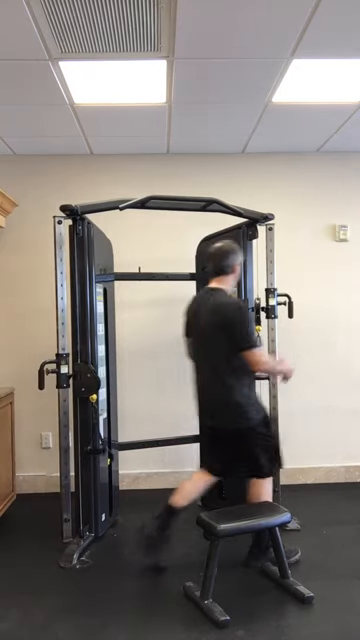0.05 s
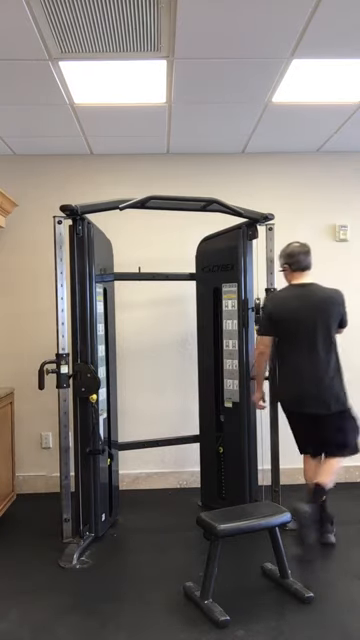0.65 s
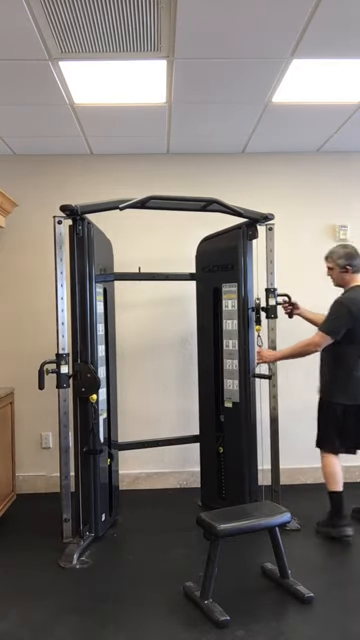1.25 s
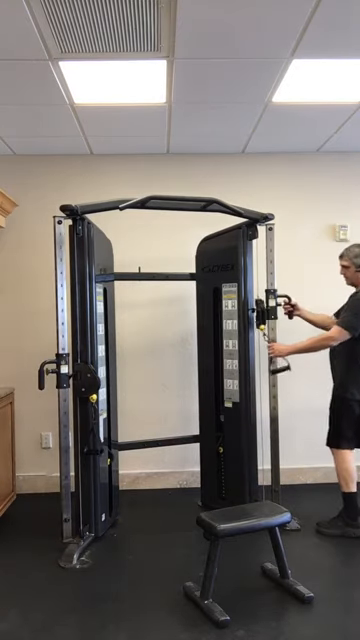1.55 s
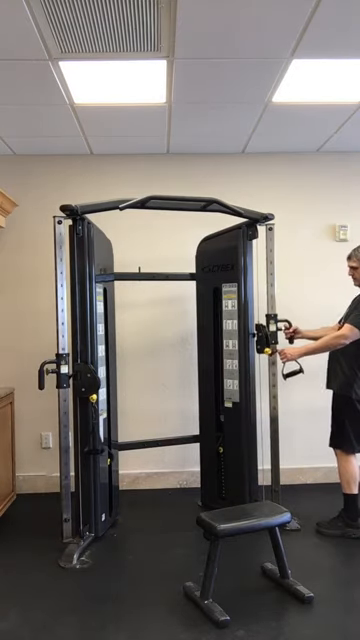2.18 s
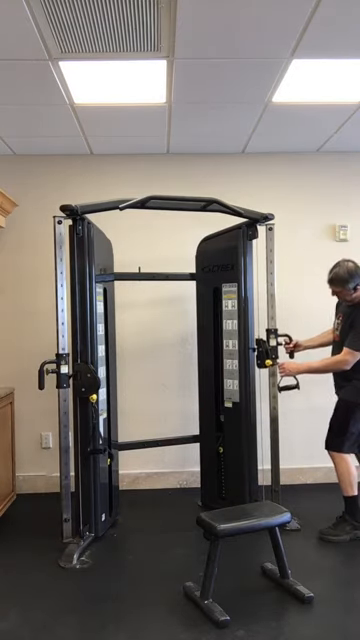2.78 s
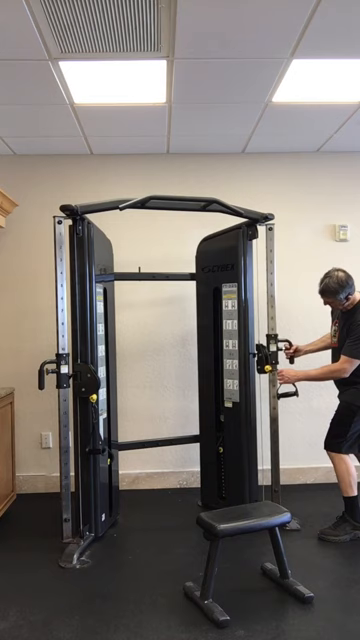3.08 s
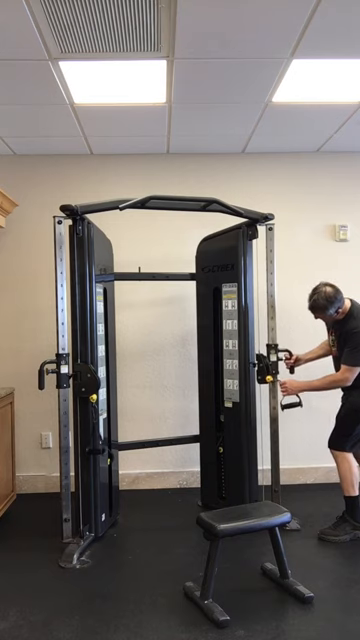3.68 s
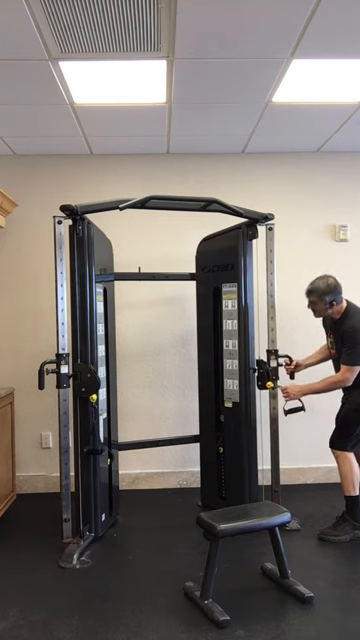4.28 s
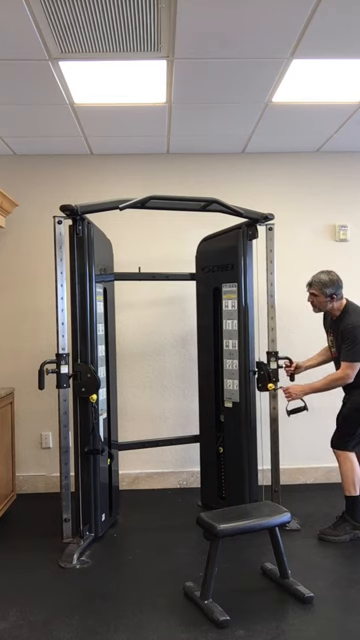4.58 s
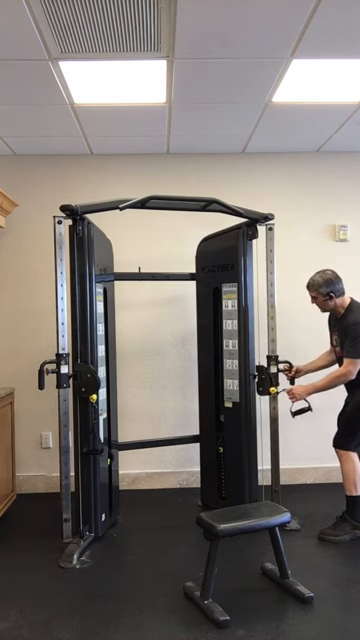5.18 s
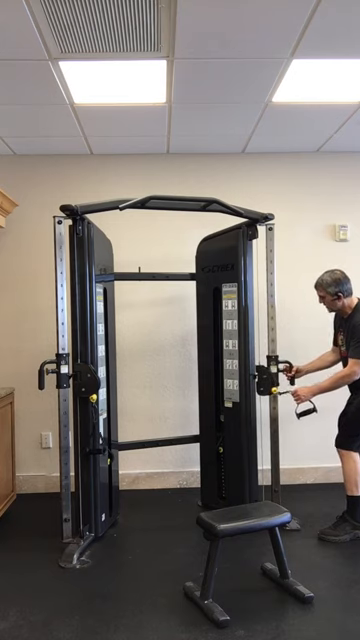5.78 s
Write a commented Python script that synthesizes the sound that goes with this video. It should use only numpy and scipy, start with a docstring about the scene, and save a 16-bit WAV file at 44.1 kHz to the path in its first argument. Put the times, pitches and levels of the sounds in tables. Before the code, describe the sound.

A gym cable machine's pulley carriage clicks, slides and lands with a loud, ringing steel clank over a low air vent hum.

```python
"""A cable machine's pulley carriage drops home with a loud clank that rings through the hollow steel frame.
Before that, someone steps up, clicks the spring pin out and slides the carriage down its upright tube.
It knocks once, the pin finds its hole, and the carriage lands, chatters and settles. Each blow is a
burst of fading noise plus the tube's ringing tones. Shoes, hands and sliding make soft hisses,
and an air vent hums through the quiet home gym."""
import sys
import numpy as np
from scipy import signal
from scipy.fft import rfft, irfft
from scipy.io import wavfile
from scipy.ndimage import map_coordinates

SR = 44100
rng = np.random.default_rng(int(sys.argv[2]) if len(sys.argv) > 2 else 0)


def inscribe(sig):
    """Save sig as 16-bit PCM at rate SR to the path in sys.argv[1].

    A 1-D sig is mono; a 2-D sig holds one channel per row.
    Samples are clipped to [-1, 1] before scaling.
    """
    pcm = np.round(np.clip(np.atleast_2d(sig).T, -1, 1) * 32767)
    wavfile.write(sys.argv[1], SR, pcm.astype(np.int16))


N = 262279
TIME = np.arange(N) / SR
SCENE_HZ = np.fft.rfftfreq(N, 1 / SR) + 1
EVENT_SIZE = SR + SR // 5   # samples in one knock, click or scuff
AGE = np.arange(EVENT_SIZE) / SR   # seconds since it began
EVENT_HZ = np.fft.rfftfreq(EVENT_SIZE, 1 / SR) + 1


# Blows on the tube: a dull knock, the pin's tip, the carriage landing, its settling.
# start_s, level_db, tilt_db_per_octave (higher is brighter), ring_db
BLOWS = [(4.967, -37, -10.5, -32.5), (5.171, -25.3, 0, -22), (5.195, -12, 1, 0.5), (5.43, -30, -0.4, -21)]
# The overall tone of the tube's countless weak vibrations: pitch_hz, level_db
TUBE_SPECTRUM = [(120, -35.5), (230, -13.5), (380, -15.5), (520, -14.5), (750, -12), (1100, -10.5),
                 (1500, -11.5), (2600, -7), (3600, -1.5), (4400, -3.5), (5000, -6), (6600, -10.5),
                 (8000, -16.5), (12500, -26.5), (16000, -32)]
# Where those vibrations crowd together: pitch_hz, width_hz, boost_db
TUBE_HUMPS = [(265, 30, 5), (350, 40, 6), (415, 35, 11), (640, 40, 6), (890, 55, 11), (985, 30, 8),
              (1330, 50, 6), (1745, 42, 14), (3400, 80, 6), (4200, 170, 2), (5520, 170, 3), (6650, 120, 5),
              (9500, 220, 5), (12400, 400, 3)]

def carriage():
    """Every blow shakes the same tube; harder ones reach lower notes, and the hardest ends in chatter."""
    full_blow_db, full_low_hz, softer_db_per_octave = -10.5, 444, 19.5
    body_db = metal_body(TUBE_SPECTRUM, TUBE_HUMPS, ripple_db=5, ripple_step=40)
    out = np.zeros(N)
    for start_s, level_db, tilt, _ in BLOWS:
        low_hz = full_low_hz * 2 ** ((full_blow_db - level_db) / softer_db_per_octave)
        add(out, start_s, steel_hit(body_db, level_db, tilt, low_hz))
    for start_s, level_db in chatter(count=3):
        add(out, start_s, steel_hit(body_db, level_db, tilt=-3.5, low_hz=240))
    return out


def chatter(count, first_s=.005, spread=2.85, drop_db=5, loss_db=1.5):
    """Times and levels of the rattle after the hardest blow: each hit is later and weaker than the last."""
    start_s, level_db, _, _ = max(BLOWS, key=lambda blow: blow[1])
    return [(start_s + first_s * spread ** k, level_db - drop_db - loss_db * k) for k in range(count)]


# How long the tube's clatter takes to fade by 60 dB: pitch_hz, fade_s
TUBE_FADES = [(250, 1.5), (900, 1.35), (2000, 1.2), (3500, .85), (6000, .68), (9000, .5), (14000, .37)]

def steel_hit(body_db, level_db, tilt, low_hz):
    """Steel meets steel: the tube clatters from low_hz upwards, and dull hits crack less."""
    bass_cut_db = 10 * np.log10(1 + (low_hz / EVENT_HZ) ** 6)
    spectrum_db = body_db + tilt_db(EVENT_HZ, tilt) - bass_cut_db
    return from_db(level_db - 5) * clatter(spectrum_db, TUBE_FADES, crack_db=8 + .6 * tilt, crack_s=.023)


# The steel tube's strong ringing tones: pitch_hz, level_db, fade_s
TUBE_TONES = [(339, -39, 1.5), (371, -38, 1.5), (415, -41, 1.5), (630, -36, 1.5), (647, -36, 1.35),
              (862, -36, 1.5), (922, -32, 1.08), (993, -29, 1.32), (1297, -37, 1.5), (1333, -33, 1.5),
              (1744, -31, 1.5), (2046, -40, 1.5), (2235, -39, 1.0), (2632, -31, 1.0), (2926, -30, 0.88),
              (3347, -26, 0.79), (3374, -15, 0.8), (3406, -11, 0.64), (3594, -21, 0.79), (3725, -27, 0.8),
              (4013, -27, 0.73), (4088, -25, 0.8), (4240, -25, 0.8), (4423, -32, 0.8), (4483, -33, 0.8),
              (4843, -33, 0.68), (5174, -30, 0.74), (5428, -35, 0.8), (6235, -31, 0.67), (6682, -30, 0.65)]

def tube_ring():
    """The tube sings on after each blow, swelling as it fills the room; dull blows ring duller."""
    out = np.zeros(N)
    for start_s, _, tilt, ring_db in BLOWS:
        ring_tilt = -.1 + .49 * min(tilt, 0)
        tones = ring(TUBE_TONES, ring_tilt, swell_s=.057, twin_db=-7.5, split_hz=24.1)
        add(out, start_s, from_db(ring_db) * tones)
    return out


# The spring pin clicking in its sleeve: start_s, level_db
CLICKS = [(1.5005, -46), (1.504, -42.5), (1.769, -54.5), (2.603, -56.5)]
# The pin's ringing tones: pitch_hz, level_db, fade_s
PIN_TONES = [(2272, 0, 0.47), (2789, 0, 0.29), (3989, -10, 0.67), (4673, -2, 0.27), (6379, -5, 0.42),
             (6621, -8, 0.52), (6971, -10, 0.49), (7515, -14, 0.48), (11880, -19, 0.37)]
# The overall tone of its clatter: pitch_hz, level_db
PIN_SPECTRUM = [(300, -21), (700, -9), (1100, -8.5), (2200, -7.5), (3300, -11.5), (5300, -10.5),
                (6800, -8.5), (9000, -16), (10700, -28), (12500, -20), (16000, -34)]
# Where its vibrations crowd together: pitch_hz, width_hz, boost_db
PIN_HUMPS = [(630, 45, 8), (2060, 90, 7), (2300, 90, 6), (2780, 90, 4), (4330, 150, 7), (6400, 160, 6),
             (12250, 450, 5)]
# How long its clatter takes to fade by 60 dB: pitch_hz, fade_s
PIN_FADES = [(500, 0.87), (3000, 0.45), (7000, 0.57), (15000, 0.2)]

def spring_pin(firm_click_db=-42.5, ring_db=-12):
    """The small steel pin rings higher and shorter than the tube, brighter the firmer the click."""
    body_db = metal_body(PIN_SPECTRUM, PIN_HUMPS, ripple_db=-1, ripple_step=47)
    out = np.zeros(N)
    for start_s, level_db in CLICKS:
        tilt = -1 + .46 * (level_db - firm_click_db)
        click = clatter(body_db + tilt_db(EVENT_HZ, tilt), PIN_FADES, crack_db=8, crack_s=.0083)
        tones = ring(PIN_TONES, tilt, swell_s=.002, twin_db=-8, split_hz=27)
        add(out, start_s, from_db(level_db) * (click + from_db(ring_db) * tones))
    return out


def metal_body(spectrum, crowds, ripple_db, ripple_step):
    """A metal part's tone in dB: a broad shape, humps, and fine ripples that deepen in the treble."""
    depth = np.minimum(np.sqrt(EVENT_HZ / 5000), 1)
    ripple = np.tanh(wander(len(EVENT_HZ), ripple_step) - .5)
    return at_hz(spectrum, EVENT_HZ) + humps(EVENT_HZ, crowds) + ripple_db * depth * ripple


def clatter(spectrum_db, fades, crack_db, crack_s):
    """Struck metal gives a brief bright crack and a longer wash of countless vibrations."""
    crack = noise(spectrum_db + tilt_db(EVENT_HZ, 2), EVENT_SIZE) * np.exp(-AGE / crack_s)
    wash = die_away(noise(spectrum_db, EVENT_SIZE), fades)
    attack = 1 - np.exp(-AGE / .0005)
    return attack * (from_db(crack_db) * crack + wash)


def ring(tones, tilt, swell_s, twin_db, split_hz):
    """Tones swell and fade; each has a weaker twin at almost the same pitch, so it throbs."""
    out = 0
    for hz, level_db, fade_s in tones:
        phase, split = rng.random(2)
        angle = 2 * np.pi * (hz * AGE + phase)
        offset_hz = split_hz * (2 * split - 1)
        twin = from_db(twin_db) * np.cos(angle + 2 * np.pi * offset_hz * AGE)
        loudness = from_db(level_db + tilt_db(hz, tilt) - 60 * AGE / fade_s)
        out = out + (np.sin(angle) + twin) * loudness
    return out * (1 - np.exp(-AGE / swell_s))


# Shoes brushing the rubber floor, hands taking hold, the carriage sliding:
# start_s, rise_s, fall_s, level_db, tilt_db_per_octave
STROKES = [(.408, 0.012, 0.1, -55, 5), (.98, 0.015, 0.075, -54.5, 4), (1.16, 0.097, 0.23, -52, 2.5),
           (2.42, .03, 0.089, -53, 3.5), (2.46, 0.033, .06, -50, -2.5)]
# The overall tone of the rubbing: pitch_hz, level_db
SCUFF_SPECTRUM = [(300, 4), (1000, 3), (2200, 1), (4300, -5), (5000, -9), (6500, -12), (10500, -25),
                  (15500, -31)]

def scuffs():
    """Surfaces rub with a soft, grainy hiss that swells and fades with each stroke."""
    out = np.zeros(N)
    for start_s, rise_s, fall_s, level_db, tilt in STROKES:
        stroke = np.minimum(AGE / rise_s, 1) * np.exp(-np.maximum(AGE - rise_s, 0) / fall_s)
        hiss = noise(at_hz(SCUFF_SPECTRUM, EVENT_HZ) + tilt_db(EVENT_HZ, tilt), EVENT_SIZE)
        grain_db = wander(EVENT_SIZE, step=189)
        add(out, start_s, hiss * stroke * from_db(level_db + grain_db))
    return out


# The overall tone of the rushing air: pitch_hz, level_db
AIR_SPECTRUM = [(20, -28.5), (40, -7), (100, -0.5), (190, -2.5), (370, -8), (470, -18.5), (1000, -20.5),
                (2450, -27), (3300, -33), (5000, -39), (9600, -46.5), (10500, -50), (15000, -54.5),
                (16000, -70)]
# The duct's resonances: pitch_hz, width_hz, boost_db
DUCT_HUMPS = [(570, 35, 5), (875, 40, 8), (1200, 60, 2), (1370, 50, 3), (1680, 120, -2), (4350, 280, 4),
              (6400, 400, 2)]
# The fan's low tones: pitch_hz, level_db
FAN_HUM = [(59, -54), (118.4, -51), (147, -60), (176.5, -46), (204.6, -48.5), (232, -56.5), (263.8, -58)]

def air_vent(rush_db=-43, waver=.28, waver_s=.05):
    """Air rushes through the duct while the fan hums with wavering tones."""
    out = from_db(rush_db) * noise(at_hz(AIR_SPECTRUM, SCENE_HZ) + humps(SCENE_HZ, DUCT_HUMPS), N)
    for hz, level_db in FAN_HUM:
        # A complex number lets the sway move both level and phase.
        sway = 1 + waver * (wander(N, waver_s * SR) + 1j * wander(N, waver_s * SR))
        tone = np.real(sway * np.exp(2j * np.pi * hz * TIME))
        out = out + from_db(level_db) * rms_one(tone)
    return out


# How long the room's echo takes to fade by 60 dB: pitch_hz, fade_s
ROOM_FADES = [(150, .55), (1000, .5), (5000, .45), (14000, .3)]

def room(sound, echo_db):
    """The direct sound plus a smooth echo whose treble dies first."""
    build_up = 1 - np.exp(-AGE / .0074)
    tail = die_away(rng.standard_normal(EVENT_SIZE), ROOM_FADES) * build_up
    echo = signal.fftconvolve(sound, tail / np.sqrt(np.sum(tail ** 2)))[:N]
    return sound + from_db(echo_db) * echo


def from_db(db):
    """Turn decibels into a multiplier."""
    return 10 ** (np.asarray(db) / 20)


def rms_one(x):
    """Scale a signal so its average strength (rms) is 1."""
    return x / np.sqrt(np.mean(x ** 2) + 1e-20)


def at_hz(table, hz):
    """Read between a table's rows, with pitch spaced in octaves."""
    pitches, values = np.transpose(table)
    return np.interp(np.log(hz), np.log(pitches), values)


def tilt_db(hz, db_per_octave):
    """Hard contacts lift the treble and soft ones dull it, pivoting on the tube's main ring."""
    return db_per_octave * np.log2(np.maximum(hz, 900) / 3400)


def humps(hz, table):
    """Resonances as bell-shaped bumps, in dB."""
    return sum(boost_db * np.exp(-((hz - centre) / width) ** 2) for centre, width, boost_db in table)


def wander(count, step):
    """A smooth random curve of strength 1 that takes a new value every step points."""
    knots = rng.standard_normal(count)[:int(count / step) + 4]
    return rms_one(map_coordinates(knots, [np.arange(count) / step], order=2, mode="nearest"))


def noise(spectrum_db, size):
    """Noise of strength 1 with the given tone."""
    return rms_one(irfft(rfft(rng.standard_normal(size)) * from_db(spectrum_db), size))


def die_away(sound, fades):
    """Split a sound into pitch bands and let each fade at its own rate."""
    centres = np.geomspace(150, 16000, 12)
    spectrum = rfft(sound)
    out = 0
    for hz, pick in zip(centres, np.eye(len(centres))):
        band = irfft(spectrum * np.interp(np.log(EVENT_HZ), np.log(centres), pick), EVENT_SIZE)
        out = out + band * from_db(-60 * AGE / at_hz(fades, hz))
    return out


def add(track, start_s, sound):
    """Mix a sound into the track at start_s."""
    start = int(start_s * SR)
    track[start:start + len(sound)] += sound[:N - start]


def scene():
    """The machine stands a few metres off, in the hum of the room."""
    machine = room(carriage() + spring_pin(), echo_db=-6.5) + tube_ring()
    return (machine + room(scuffs(), echo_db=-2.5) + air_vent())[None]


def record(dry, ceiling=.98, cutoff_hz=15900):
    """Round off the loudest peaks and cut the highest treble."""
    rounded = dry / (1 + (dry / ceiling) ** 4) ** .25
    return signal.sosfilt(signal.ellip(10, .2, 80, cutoff_hz, fs=SR, output="sos"), rounded)


dry = scene()
out = record(dry)
inscribe(out)
```